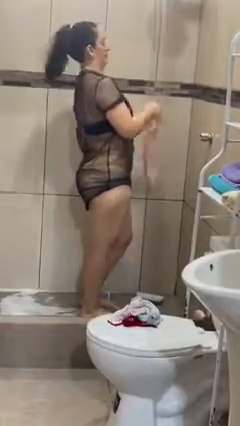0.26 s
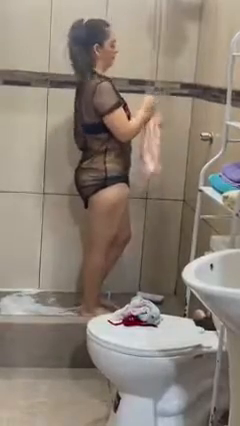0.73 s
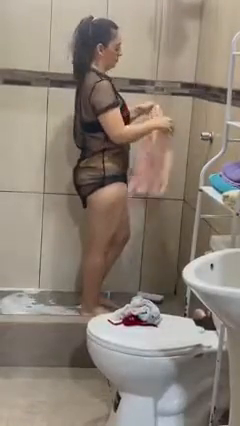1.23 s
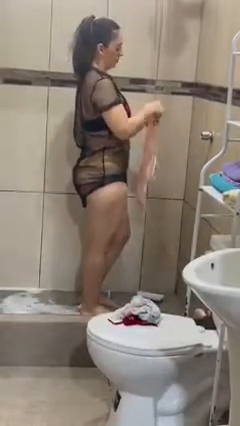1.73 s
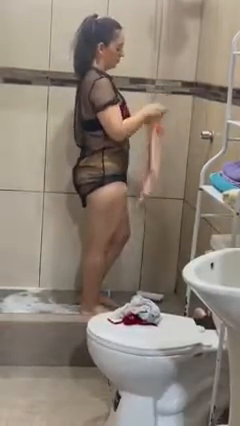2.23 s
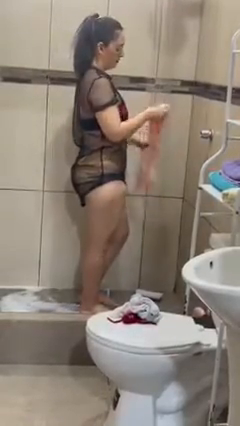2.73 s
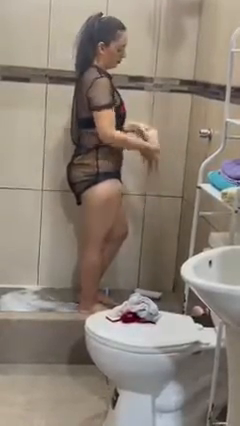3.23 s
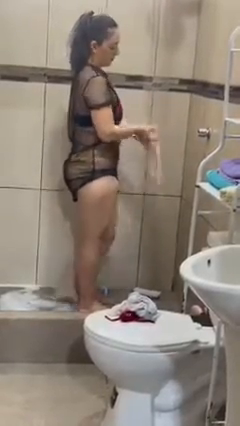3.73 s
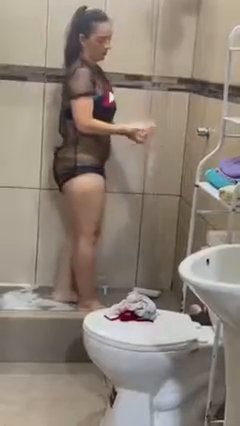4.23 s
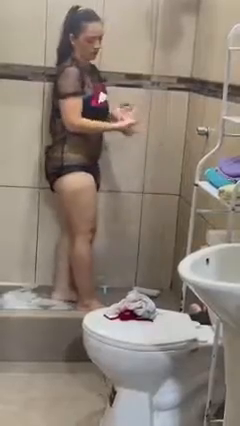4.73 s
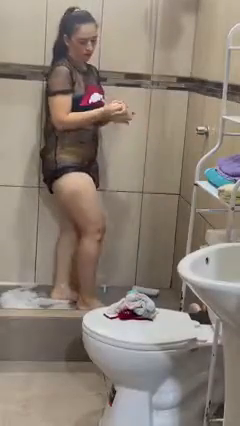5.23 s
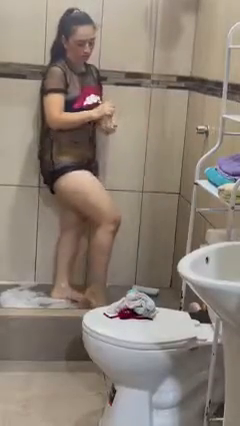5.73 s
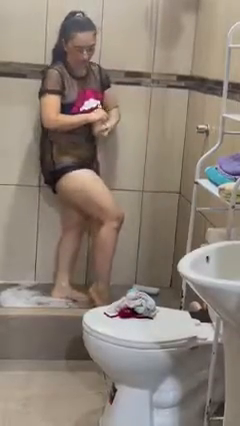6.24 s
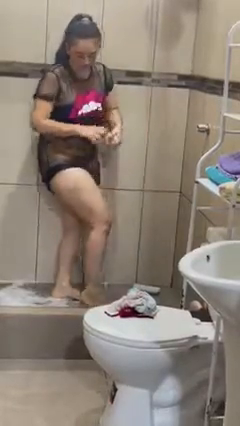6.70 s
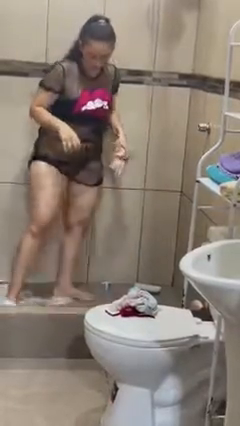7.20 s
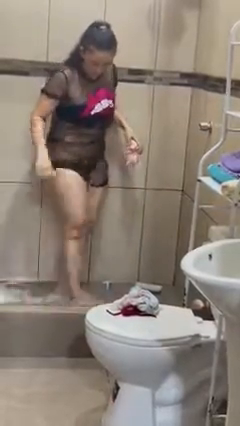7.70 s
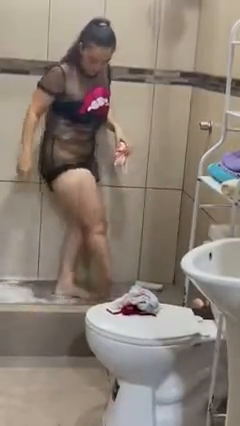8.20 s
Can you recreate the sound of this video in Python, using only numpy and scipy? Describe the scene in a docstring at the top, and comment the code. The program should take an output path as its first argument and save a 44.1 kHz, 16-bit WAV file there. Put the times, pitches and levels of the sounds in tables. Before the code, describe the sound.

A shower runs in a small tiled bathroom with bright, short echoes, picked up in stereo from a little distance. Beneath it a low electrical motor hum throbs gently, nearly three times a second, with boomy rumble and a dull surge at the start. From 0 to 3 seconds a cloth is rinsed: thin crisp spray with quick spills and wet slaps near 0.2, 1.2 and 2.4 seconds. Smaller trickles follow, then a sharp, bright splash lands at 3.8, with more splatter around 4.1. The spray swells at 4.3 and hands spill water until about 4.8, with another splat near 4.6. From 5.2 it settles into steadier pattering, fine hiss with fewer heavy drops, and the hum dips briefly just after 5. Faint puddle sloshes come and go. At 7.9 a foot makes a small hollow gulp and bubbly sweep through water; the spray continues to 8.4.

```python
"""Rinsing under a shower

A shower runs in a small tiled bathroom while someone rinses a cloth and their hands under it.
Fine spray, heavier drops and bubbles are random clicks and short rings; spills and slaps swell over them.
Feet stir the puddle, and late on one foot gulps and sweeps through it. The tiled walls add echoes.
Below, a mains-driven motor hums with a slow beat, and low noise rumbles in the room's resonances."""
import sys
import numpy as np
from scipy import signal
from scipy.fft import rfft, irfft
from scipy.io import wavfile
from scipy.ndimage import uniform_filter1d

SR = 44100
rng = np.random.default_rng(int(sys.argv[2]) if len(sys.argv) > 2 else 0)


def generate_wav(sig):
    """Save sig (samples, or channels by samples) to the path in sys.argv[1] as 16-bit PCM at SR."""
    pcm = np.round(np.clip(np.atleast_2d(sig).T, -1, 1) * 32767).astype(np.int16)
    wavfile.write(sys.argv[1], SR, pcm)


N = 373086  # length in samples
TIME = np.arange(N) / SR  # seconds
HZ = np.fft.rfftfreq(N, 1 / SR)

# Levels of the water are set before the room is added. Colours give only the balance of pitches.
# steady stream, stronger once the cloth is out of its way: time_s, spray_db, runoff_db
STREAM = [(0, -39.5, -45.5), (1.5, -38, -45), (2.85, -39.5, -47.5), (3.8, -38, -43.5), (4.25, -31, -36.5),
          (5.1, -35, -49), (5.8, -34.5, -46), (6.85, -34, -41), (7.6, -35, -42.5), (8.46, -33.5, -37.5)]
# cloth and hands tip out gathered water: start_s, length_s, spray_db, runoff_db
SPILLS = [(.22, .05, -37, -38), (.49, 0.11, -54, -45), (.69, 0.094, -40.5, -48), (.92, 0.08, -46, -45),
          (1.18, 0.082, -32, -35.5), (1.28, 0.08, -37.5, -38.5), (1.54, 0.062, -36, -39.5),
          (1.79, 0.079, -55, -40), (1.93, 0.077, -39, -41.5), (2.12, 0.044, -36, -44),
          (2.20, 0.073, -34, -59), (2.43, .06, -39, -37), (2.55, 0.028, -45, -45), (2.97, 0.17, -38, -42),
          (3.37, 0.057, -33, -43.5), (3.63, 0.11, -36, -43), (3.82, .12, -39.5, -38),
          (3.95, 0.22, -41, -36.5), (4.44, 0.28, -36.5, -35), (4.77, .11, -39, -39),
          (5.18, 0.22, -35.5, -43.5), (5.98, 0.12, -33.5, -42), (8.0, 0.17, -37, -45)]
SPILL_RISE_S, SPILL_FALL_S = 0.032, 0.045
# colour of the fine spray: pitch_hz, level_db
SPRAY_COLOUR = [(400, -20.5), (1200, -16), (2500, -5.5), (4500, -5.5), (5800, -0.5), (7600, 2), (8300, 1),
                (9400, 5.5), (10000, -9)]
# colour of the heavy drops: pitch_hz, level_db
RUNOFF_COLOUR = [(500, -29.5), (1200, -21), (1700, -3), (2400, 1), (3400, -0.5), (4500, 0), (6000, -3),
                 (8000, -5.5), (10000, -23)]
# colour of splats in the puddle: pitch_hz, level_db
PUDDLE_COLOUR = [(200, -21), (450, 0), (650, -3), (850, 1.5), (1200, 0), (1700, 1.5), (3000, -21)]
# water and feet stir the puddle: start_s, length_s, level_db
SLOSHES = [(.45, 0.19, -49.5), (.75, 0.091, -46), (2.11, 0.1, -48), (2.54, 0.055, -48.5),
           (2.9, 0.061, -48.5), (3.58, 0.26, -49.5), (4.05, 0.25, -52.5), (6.02, .22, -50),
           (6.72, 0.089, -52), (7.19, 0.051, -46.5), (7.63, 0.19, -50), (7.99, 0.078, -39.5)]
SLOSH_RISE_S, SLOSH_FALL_S, LAPPING_DB = 0.022, 0.14, -52.5

MAINS_HZ = 60.04
MAINS_DB, THIRD_DB = -56, -55.5  # the weak odd harmonics
# the hum at twice the mains beats against the motor, which slips a little behind it
HUM_DB, MOTOR_DB = -39.5, -48.5
BEAT_HZ, BEAT_CREST_S = 2.73, 0.2
HUM_DIP_S, HUM_DIP_WIDTH_S, HUM_DIP_DB = 5.14, 0.081, -16  # the even harmonics dip briefly
# fourth harmonic of the hum, before its waver and the dip: time_s, level_db
FOURTH_HARMONIC = [(.1, -60), (.33, -44.5), (1.0, -45.5), (1.3, -51.5), (1.8, -42.5), (3.2, -43),
                   (4.1, -47.5), (5.6, -42.5), (8.05, -45), (8.46, -55)]

# low resonances of the room: pitch_hz, width_hz, level_db
BOOM = [(57.2, 9.6, 3), (99.4, 26, 0), (130, 24, -1.5), (157, 7.1, -1.5), (184.8, 27, 5), (205.7, 30, 2.5),
        (247, 9.6, -1), (273.4, 6.6, -6), (290.8, 33, -3), (355.3, 7.7, -3), (395.5, 26, -3),
        (442, 12, -18)]
# smooth noise under the resonances: pitch_hz, level_db
RUMBLE_BED = [(20, -33), (45, -12.5), (100, -12), (300, -10), (500, -13.5), (800, -31), (2000, -46)]
RUMBLE_DB = -40
# dull surges in the rumble: start_s, length_s, level_db
SURGES = [(.10, 0.29, -36), (.52, 0.58, -41), (.76, 0.064, -36), (4.31, 0.099, -40), (6.05, 0.16, -43.5)]
SURGE_RISE_S, SURGE_FALL_S = 0.045, 0.064
# colour of the surges: pitch_hz, level_db
SURGE_COLOUR = [(60, -32), (105, 6), (190, -7.5), (280, 5), (340, -0.5), (410, 5), (520, -2), (750, -13)]

# lumps of water that slap the wet floor: start_s, level_db, centre_hz, width_octaves
SLAPS = [(.237, -29.5, 5830, 0.89), (.792, -37.5, 1980, 0.28), (1.194, -30.5, 4700, 0.33),
         (1.285, -34, 2480, 0.28), (1.355, -36, 5770, 0.12), (1.82, -42.5, 2380, 0.21),
         (2.149, -36.5, 3250, .46), (2.411, -30.5, 6700, 0.32), (2.452, -33.5, 4250, 0.43),
         (2.56, -33, 5900, .35), (3.12, -38, 2480, 0.3), (3.821, -23.5, 5270, 0.39),
         (3.905, -30, 5850, 0.21), (3.953, -34, 2630, 0.29), (4.057, -27, 3820, .66),
         (4.094, -32, 2130, 0.51), (4.595, -28, 5350, .53), (4.628, -31.5, 1750, 0.4),
         (5.191, -35, 4540, .7), (5.306, -39, 1560, .41)]
SLAP_RISE_S, SLAP_DECAY_S = 0.0009, 0.031
# a foot first presses a pocket of air out from under the sole
GULP_S, GULP_DB, GULP_HZ, GULP_DECAY_S = 7.905, -39, 850, 0.048
# then it sweeps through the puddle: start_s, length_s, level_db
SWEEP = [(7.93, 0.15, -37)]
SWEEP_RISE_S, SWEEP_FALL_S, SWEEP_HZ, SWEEP_OCTAVES = 0.094, 0.13, 2000, 0.78

# time for the tile echoes to fall by 60 dB: pitch_hz, decay_s
TILE_DECAY = [(200, 0.34), (1000, 0.63), (4000, 0.67), (10000, 0.42)]
# echoes that differ between left and right, side against middle: pitch_hz, level_db
WIDTH = [(100, -48.5), (260, -23), (450, 0.5), (700, -8), (1400, -5.5), (1800, -42), (2200, -59),
         (2500, -18.5), (4000, -15), (5200, -10), (5700, -31), (6300, -16), (6700, -9), (8700, -5),
         (9400, -22)]
# the two microphone ports hear the treble out of step: pitch_hz, left_lead_radians
PORT_PHASE = [(2100, 0), (2500, .3), (3700, .35), (4200, .9), (4580, 1.5), (4750, 2.7), (5000, 3.6),
              (5130, 4.7), (5550, 6.28), (6400, 6.3), (6650, 7.2), (7800, 7.9), (8000, 6.4), (9000, 6.28)]
EDGE_HZ = 10150  # top of the recorder's range


def gain_of(db):
    """Turns decibels into a plain multiplier."""
    return 10 ** (np.asarray(db) / 20)


def evened(x):
    """Scales a sound to an average strength (rms) of one."""
    return x / np.sqrt(np.mean(x ** 2) + 1e-20)


def read(points, hz):
    """Reads a table between its rows, with pitch on a log scale as we hear it."""
    table_hz, value = np.transpose(points)
    return np.interp(np.log(hz + 1), np.log(table_hz + 1), value)


def level(rows, column):
    """Turns one dB column of a timed table into a smooth gain."""
    columns = np.transpose(rows)
    return gain_of(np.interp(TIME, columns[0], columns[column]))


def swells(rows, rise_s, fall_s, column):
    """Gain of events that rise, hold for their length and die away; their powers add."""
    power = np.zeros(N)
    for row in rows:
        age = np.maximum(TIME - row[0], 0)
        rise = np.minimum(age / rise_s, 1)
        fall = np.exp(-np.clip((age - row[1]) / fall_s, 0, 20))
        power += (gain_of(row[column]) * rise * fall) ** 2
    return np.sqrt(power)


def coloured(x, colour):
    """Makes some pitches stronger than others, at an rms of one."""
    return evened(irfft(rfft(x) * gain_of(read(colour, HZ)), N))


def wander(per_s):
    """Slow random motion with an rms of one; motion faster than per_s fades out."""
    return evened(irfft(rfft(rng.standard_normal(N)) / (1 + (HZ / per_s) ** 4), N))


def impacts(per_s, spread_db):
    """Clicks of drops landing at random, with random sizes and directions."""
    size = gain_of(spread_db * np.minimum(rng.exponential(1, N), 5))
    direction = rng.choice([-1, 1], N)
    return size * direction * (rng.random(N) < per_s / SR)


def bubbles(per_s, low_hz, high_hz, cycles, spread_db, count=40):
    """Trapped bubbles ring briefly and rise in pitch as they near the surface."""
    clicks = impacts(per_s, spread_db)
    kind = rng.integers(0, count, N)  # which bubble pitch each click sets off
    t, out = np.arange(1500) / SR, np.zeros(N)
    pitches = np.geomspace(low_hz, high_hz, count) * rng.uniform(1.0, 1.03, count)
    for k, hz in enumerate(pitches):
        age = t * hz / cycles
        ring = np.exp(-3 * age) * np.sin(2 * np.pi * hz * t * (1 + 0.017 * age))
        out += signal.oaconvolve(clicks * (kind == k), ring)[:N]
    return evened(out)


def spray():
    """Thousands of fine drops a second tick on the wet tiles."""
    drops = coloured(impacts(per_s=5500, spread_db=1.0), SPRAY_COLOUR)
    spilled = swells(SPILLS, SPILL_RISE_S, SPILL_FALL_S, column=2)
    amount = np.hypot(level(STREAM, column=1), spilled)  # adds the powers
    flutter = gain_of(1.6 * wander(per_s=75) + 0.49 * wander(per_s=15))
    return drops * amount * flutter


def runoff():
    """Heavier drops leave the cloth and hands in clumps; some trap a bubble."""
    drops = coloured(impacts(per_s=1700, spread_db=2.5), RUNOFF_COLOUR)
    plinks = bubbles(per_s=300, low_hz=1509, high_hz=6680, cycles=71, spread_db=3.5)
    clumps = gain_of(1.2 * wander(per_s=25))
    spilled = swells(SPILLS, SPILL_RISE_S, SPILL_FALL_S, column=3)
    amount = np.hypot(level(STREAM, column=2), spilled)
    return (drops + gain_of(-10.5) * plinks) * clumps * amount


def puddle():
    """Drops and feet stir the standing water, which splats and gurgles."""
    splats = coloured(impacts(per_s=1500, spread_db=2.0), PUDDLE_COLOUR)
    gurgle = bubbles(per_s=90, low_hz=491.4, high_hz=1503, cycles=16.4, spread_db=-2.5)
    lapping = gain_of(LAPPING_DB + 1.0 * wander(per_s=4.4))
    stirred = np.hypot(lapping, swells(SLOSHES, SLOSH_RISE_S, SLOSH_FALL_S, column=2))
    return (gain_of(-1.5) * splats + gain_of(-6) * gurgle) * stirred


def partial(order, gain):
    """One harmonic of the mains, wavering a little in phase."""
    angle = 2 * np.pi * order * MAINS_HZ * TIME + 0.075 * wander(per_s=2.0)
    return np.sqrt(2) * (gain * np.exp(1j * angle)).imag


def hum():
    """Magnetic hum is strongest at twice the mains, where the slipping motor beats against it."""
    beat = np.exp(-2j * np.pi * BEAT_HZ * (TIME - BEAT_CREST_S))  # turns backwards: a lower pitch
    steady = gain_of(HUM_DB + 0.8 * wander(per_s=3))
    dip = gain_of(HUM_DIP_DB * np.exp(-((TIME - HUM_DIP_S) / HUM_DIP_WIDTH_S) ** 2))
    second = partial(order=2, gain=(steady + gain_of(MOTOR_DB) * beat) * dip)
    fourth_gain = level(FOURTH_HARMONIC, column=1) * gain_of(1.0 * wander(per_s=7.5))
    fourth = partial(order=4, gain=fourth_gain * dip)
    first = partial(order=1, gain=gain_of(MAINS_DB + 4.0 * wander(per_s=3.1)))
    third = partial(order=3, gain=gain_of(THIRD_DB + 0.98 * wander(per_s=4)))
    return first + second + third + fourth


def room_boom():
    """The room's low resonances strengthen noise near their own pitches."""
    return sum(gain_of(db) / (1 + ((HZ - hz) / (0.5 * width)) ** 2) for hz, width, db in BOOM)


def rumble():
    """The machine's low noise and a few dull surges boom in the resonances of the room."""
    response = np.hypot(room_boom(), gain_of(read(RUMBLE_BED, HZ)))
    noise = rng.standard_normal((2, N))
    steady, surge = irfft(rfft(noise) * response, N)
    surging = swells(SURGES, SURGE_RISE_S, SURGE_FALL_S, column=2)
    return gain_of(RUMBLE_DB) * evened(steady) + coloured(surge, SURGE_COLOUR) * surging


def droplets(centre_hz, octaves, size):
    """A dense burst of tiny impacts around one pitch, at an rms of one."""
    clicks = rng.standard_normal(size) * (rng.random(size) < 0.05)
    octaves_away = np.log2((np.fft.rfftfreq(size, 1 / SR) + 1) / centre_hz)
    band = np.exp(-0.5 * (octaves_away / octaves) ** 2)
    return evened(irfft(rfft(clicks) * band, size))


def add(mix, start_s, sound):
    """Mixes a sound in at a given time, cutting it off where the mix ends."""
    part = mix[max(round(start_s * SR), 0):][:len(sound)]
    part += sound[:len(part)]


def slaps():
    """A lump of water lands and scatters into a dying burst of droplets."""
    out, t = np.zeros(N), np.arange(SR // 2) / SR
    shape = np.exp(-t / SLAP_DECAY_S) * (1 - np.exp(-t / SLAP_RISE_S))
    shape /= shape.max()
    for start_s, db, centre_hz, octaves in SLAPS:
        burst = droplets(centre_hz, octaves, size=len(t))
        add(out, start_s, gain_of(db) * burst * shape)
    return out


def foot():
    """A hollow gulp under the sole, then a bubbly wash as the foot pushes water aside."""
    age = np.maximum(TIME - GULP_S, 0)
    pitch_hz = GULP_HZ * (1 + 0.05 * wander(per_s=70))
    tone = np.sin(2 * np.pi * np.cumsum(pitch_hz) / SR)
    gulp = tone * np.minimum(age / 0.004, 1) * np.exp(-age / GULP_DECAY_S)
    wash = gain_of(-2) * droplets(SWEEP_HZ, SWEEP_OCTAVES, size=N)
    wash += gain_of(-4.0) * bubbles(per_s=120, low_hz=1384, high_hz=2770, cycles=59, spread_db=0, count=12)
    return gain_of(GULP_DB) * gulp + wash * swells(SWEEP, SWEEP_RISE_S, SWEEP_FALL_S, column=2)


def tail():
    """Dense reflections between tiled walls, each band dying at its own speed."""
    after_gap = np.arange(SR) > 0.003 * SR  # no echo in the first 3 ms
    taps = rng.choice([-1., 1.], SR) * (rng.random(SR) < 5000 / SR) * after_gap
    hz, t, bands = signal.stft(taps, SR, nperseg=256)
    fade = gain_of(-60 * t / read(TILE_DECAY, hz)[:, None])
    ring = signal.istft(bands * fade, SR, nperseg=256)[1]
    return ring / np.linalg.norm(ring)


def reflections(x, count):
    """The water keeps landing on other spots, and each spot has its own echoes."""
    spot = rng.integers(0, count, N // 256 + 1)[np.arange(N) // 256]  # a new pick every 256 samples
    out = np.zeros(N)
    for k in range(count):
        share = np.sqrt(abs(uniform_filter1d(1. * (spot == k), 128)))  # soft change of spot
        out += signal.oaconvolve(x * share, tail()[:SR // 2])[:N]
    return out


def bathroom(patter, hits, direct_db, hits_direct_db):
    """Direct and reflected sound reach two microphone ports; where they oppose, the middle cancels."""
    direct = gain_of(direct_db)
    wet = patter + gain_of(1.0) * hits
    near = direct * patter + gain_of(hits_direct_db) * hits
    ahead = rfft(near + reflections(wet, count=12)) / np.hypot(direct, 1)
    diffuse = rfft(reflections(wet, count=4)) * gain_of(read(WIDTH, HZ))
    turn = read(PORT_PHASE, HZ) / 2  # half the lead to each port
    mid = irfft(ahead * np.cos(turn), N)
    side = irfft(1j * ahead * np.sin(turn) + diffuse, N)
    return np.array([mid + side, mid - side])  # left, right


def scene():
    """The water in the room, with hum and rumble in the middle."""
    patter = spray() + runoff() + puddle()
    water = bathroom(patter, slaps() + foot(), direct_db=-2, hits_direct_db=1.0)
    return water + hum() + rumble()


def record(dry):
    """The band limit of the recorder: a steep filter removes the highest treble."""
    low_pass = signal.firwin(601, EDGE_HZ, window=("kaiser", 9), fs=SR)
    return signal.oaconvolve(dry, low_pass[None], "same")


dry = scene()
out = record(dry)
generate_wav(out)
```